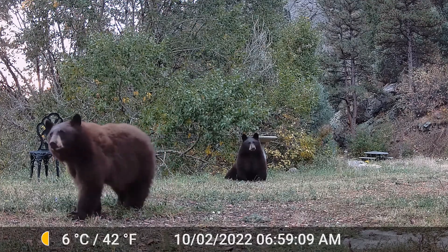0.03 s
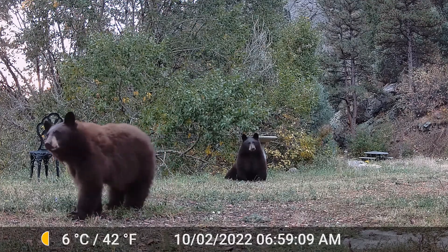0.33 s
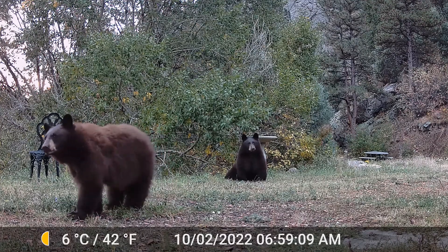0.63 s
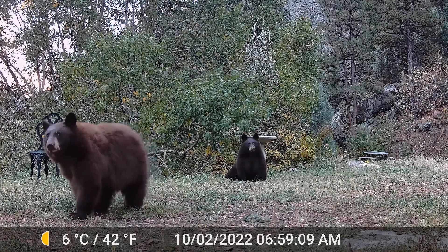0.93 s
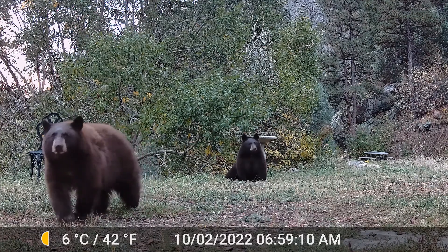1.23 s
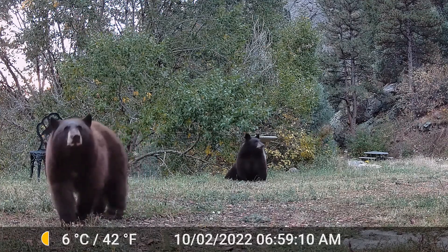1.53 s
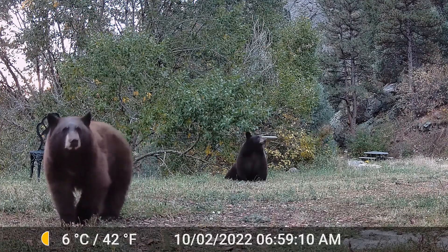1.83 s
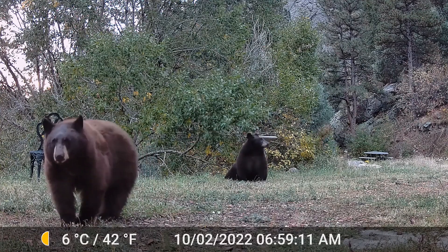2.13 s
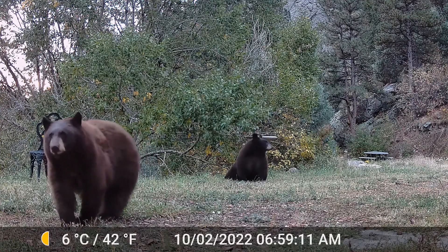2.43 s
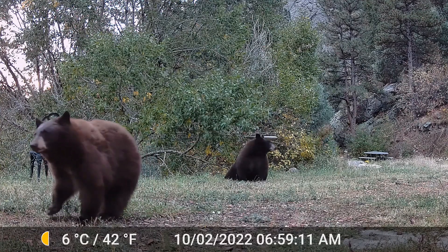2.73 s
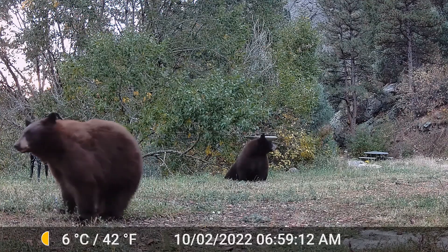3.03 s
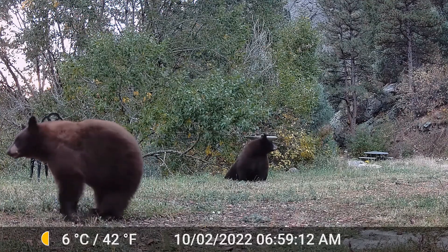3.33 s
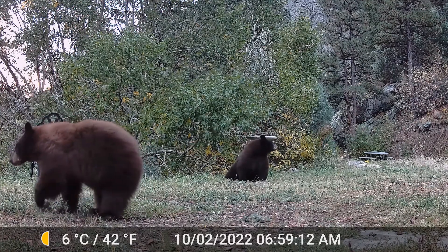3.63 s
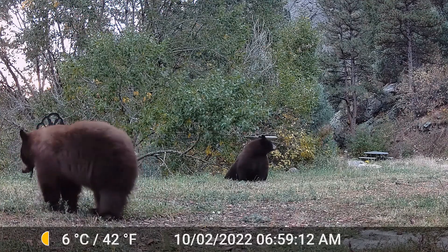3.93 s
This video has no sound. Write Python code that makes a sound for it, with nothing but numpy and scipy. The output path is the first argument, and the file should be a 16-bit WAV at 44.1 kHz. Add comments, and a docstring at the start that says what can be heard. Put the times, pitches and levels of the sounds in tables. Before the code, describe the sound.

A bird gives three short, soft whistled chirps about a second apart, then a fourth, raspy one, each with a faint forest echo. Distant wind or flowing water makes a steady low hiss underneath.

```python
"""Forest clearing at dawn.

A bird gives three soft whistled chirps and a fourth, raspy one: near-pure tones on a small pitch arch,
roughened by a fast flutter. The trees throw back a faint echo. Distant flowing water or wind makes
a steady low hiss, with five soft bumps in its rumble. Mono, band-limited; the treble dips once."""
import sys
import numpy as np
from scipy import signal
from scipy.io import wavfile
from scipy.ndimage import uniform_filter1d

SR = 44100
rng = np.random.default_rng(int(sys.argv[2]) if len(sys.argv) > 2 else 0)


def wav_record(signal):
    """Record a signal, one row per channel, as 16-bit PCM in the file named by sys.argv[1]."""
    frames = np.transpose(np.atleast_2d(signal))
    bounded = np.clip(frames, -1, 1)
    # unit amplitude maps onto the largest positive 16-bit level
    quanta = np.round(bounded * 32767).astype(np.int16)
    wavfile.write(sys.argv[1], SR, quanta)


N = 176400

# Bird calls: start_s, length_s, top_pitch_hz, arch_hz, level_db, rasp_0_to_1
BIRD_CHIRPS = [(.765, .104, 2713, 110, -22, 0.04), (1.691, 0.084, 2772, 181, -16.5, 0.01),
               (2.568, .130, 2637, 44.6, -24, 0.03), (3.626, .078, 2676, 170, -23, 0.5)]
# Ground and trunk reflections: delay_s, level_db
REFLECTIONS = [(.019, -17.5), (.038, -18.5), (.085, -25)]
# Hiss spectrum: freq_hz, relative_density_db
HISS_SPECTRUM = [(15, -17), (30, -3.5), (55, 3.5), (78, -4.5), (106, 1.5), (170, -0.5), (260, -1.5),
                 (400, -5), (560, -9), (820, -9), (1250, -16.5), (1900, -16.5), (3000, -21), (4000, -25),
                 (5200, -28.5), (6900, -36), (7500, -43), (8000, -54)]
# Bumps in the rumble: centre_s, pitch_hz, level_db
LOW_BUMPS = [(1.458, 120, -26), (1.637, 104.5, -25.5), (2.253, 115, -30.5), (3.081, 150, -36),
             (3.556, 140, -34)]
# Brief treble dip: time_s, gain_db
TREBLE_GAIN = [(3.685, 1.5), (3.697, 1), (3.704, -13), (3.711, -1), (3.73, 1.5)]


def chirp(length_s, top_hz, arch_hz, level_db, rasp):
    """Bird whistle: pitch and loudness follow one arch and catch once; uneven flutter adds rasp."""
    waver_hz, flutter_hz = 17, 249.6
    catch_db, sag_hz = -4, 25
    overtone_db, rasp_overtone_db = -46, -22.5
    progress = np.arange(0, length_s, 1 / SR) / length_s
    count = len(progress)
    arch = np.abs(np.sin(np.pi * progress ** 1.095))
    past_catch = (progress - .56) / .065  # the note dips and sags just past its middle
    pitch_hz = top_hz - arch_hz * (1 - arch) - sag_hz * (1 + np.tanh(past_catch)) / 2
    phase = 2 * np.pi * np.cumsum(pitch_hz + waver_hz * drift(count, size=200)) / SR
    flutter_phase = 2 * np.pi * np.cumsum(flutter_hz * (1 + .25 * drift(count, size=80))) / SR
    rasp_depth = rasp * 2 * progress
    sidebands = np.sin(phase + flutter_phase) + .12 * np.sin(phase + 2 * flutter_phase)
    shimmer = 1 + .75 * rasp_depth * drift(count, size=90)
    tone = (np.sin(phase) * shimmer + rasp_depth * sidebands) / np.sqrt(1 + rasp_depth ** 2)
    overtone = (amp(overtone_db) + rasp * amp(rasp_overtone_db)) * np.sin(2 * phase)
    envelope = amp(level_db + catch_db * np.exp(-past_catch ** 2)) * arch ** 3.25
    return envelope * (tone + overtone)


def forest_echo(sound, tail_db=-18, t60_s=.42, scatters_per_s=2000, rise_s=.02):
    """Direct sound, near reflections from ground and trunks, and a thin scattered tail."""
    t = np.arange(SR) / SR
    scatter = rng.standard_normal(SR) * (rng.random(SR) < scatters_per_s / SR)
    tail = scatter * amp(-60 * t / t60_s) * np.minimum(t / rise_s, 1)
    response = amp(tail_db) * tail / np.linalg.norm(tail)
    response[0] += 1
    for delay_s, level_db in REFLECTIONS:
        add(response, delay_s, amp([level_db]))
    return signal.fftconvolve(sound, response)[:N]


def low_bump(pitch_hz, level_db, decay_s=.013):
    """A few dull cycles that swell and die."""
    t = np.arange(-SR // 10, SR // 10) / SR
    envelope = amp(level_db) * np.exp(-abs(t) / decay_s)
    return envelope * np.cos(2 * np.pi * (pitch_hz * t + rng.random()))


def distant_hiss(level_db=-36, patch_db=1.0, swell_db=.18):
    """Far water or wind: dark noise with faint drifting patches and a slight swell."""
    frames, bin_hz = N // 512 + 6, np.fft.rfftfreq(2048, 1 / SR)
    real, imag, patches = rng.standard_normal((frames, len(bin_hz), 3)).T
    patches = uniform_filter1d(patches, size=12, axis=0)
    patches = unit(uniform_filter1d(patches, size=7, axis=1))
    swell = unit(uniform_filter1d(rng.standard_normal(frames), size=25))
    freq_hz, density_db = np.transpose(HISS_SPECTRUM)
    colour_db = np.interp(np.log(bin_hz + 1), np.log(freq_hz), density_db)[:, None]
    spectrum = (real + 1j * imag) * amp(colour_db + patch_db * patches + swell_db * swell)
    _, noise = signal.istft(spectrum, nperseg=2048, noverlap=1536)
    return amp(level_db) * unit(noise[:N])


def drift(count, size):
    """Random wander of rms about 1, smoothed over size samples."""
    smoothed = uniform_filter1d(rng.standard_normal(SR), size)
    return unit(uniform_filter1d(smoothed, size))[:count]


def amp(db):
    """Decibels to gain."""
    return 10 ** (np.asarray(db) / 20)


def unit(x):
    """Scale to rms 1."""
    return x / np.sqrt(np.mean(x ** 2) + 1e-20)


def add(mix, start_s, sound):
    """Mix a sound in at start_s."""
    part = mix[max(round(start_s * SR), 0):][:len(sound)]
    part += sound[:len(part)]


def scene():
    """Bird among trees, over the hiss and its low bumps."""
    bird, background = np.zeros(N), distant_hiss()
    for start_s, *call in BIRD_CHIRPS:
        add(bird, start_s, chirp(*call))
    for centre_s, pitch_hz, level_db in LOW_BUMPS:
        bump = low_bump(pitch_hz, level_db)
        add(background, centre_s - len(bump) / 2 / SR, bump)
    return (background + forest_echo(bird))[None]


def record(dry, crossover_hz=3000, cutoff_hz=7950):
    """One brief treble dip, then a steep low-pass."""
    low = signal.sosfiltfilt(signal.butter(4, crossover_hz, fs=SR, output="sos"), dry)
    treble_db = np.interp(np.arange(N) / SR, *np.transpose(TREBLE_GAIN))
    dipped = low + (dry - low) * amp(treble_db)
    lowpass = signal.firwin(511, cutoff_hz, window=("kaiser", 9), fs=SR)
    return signal.oaconvolve(dipped, lowpass[None], "same")


dry = scene()
out = record(dry)
wav_record(out)
```